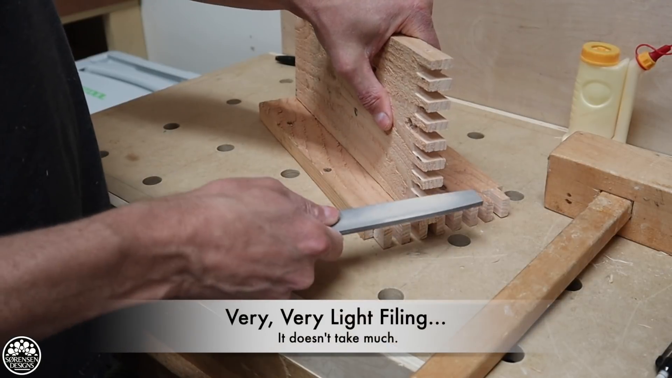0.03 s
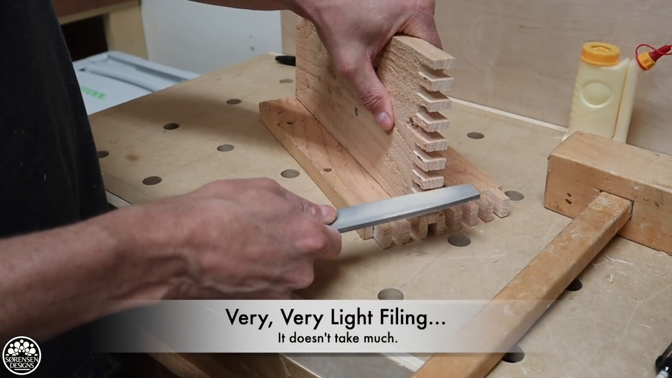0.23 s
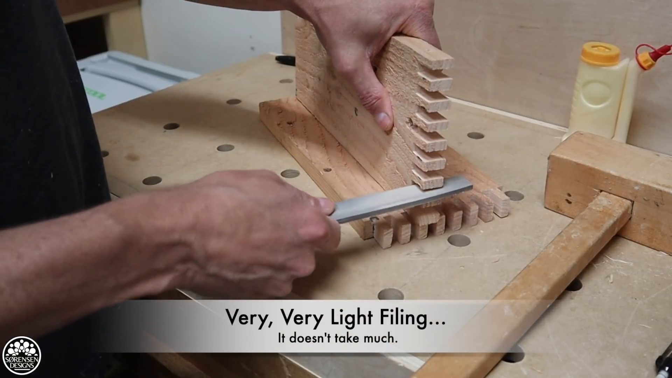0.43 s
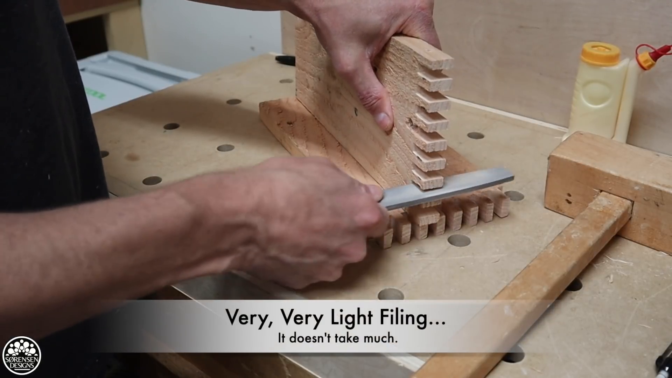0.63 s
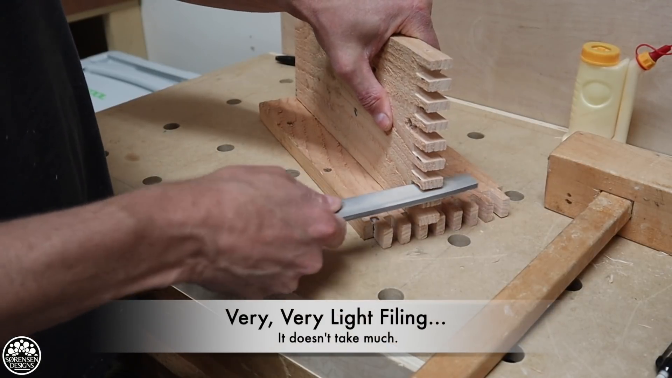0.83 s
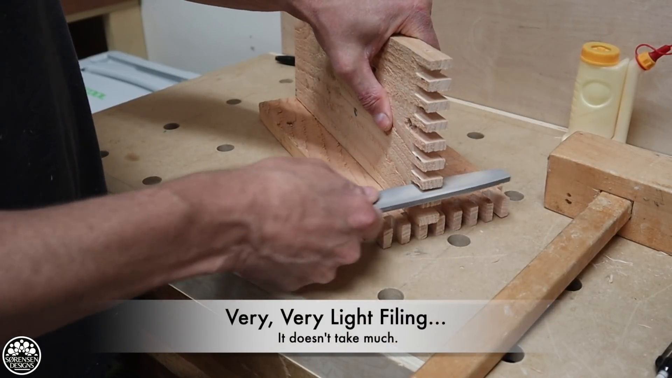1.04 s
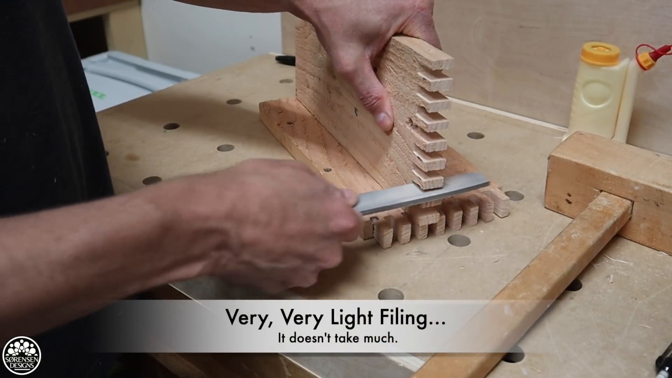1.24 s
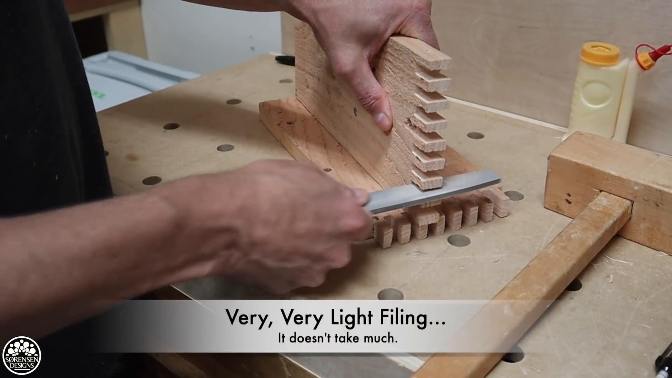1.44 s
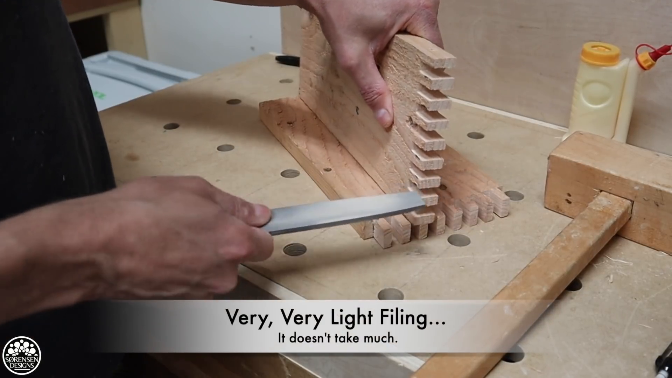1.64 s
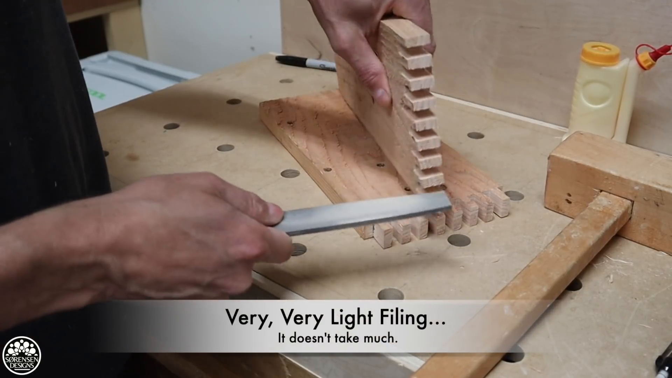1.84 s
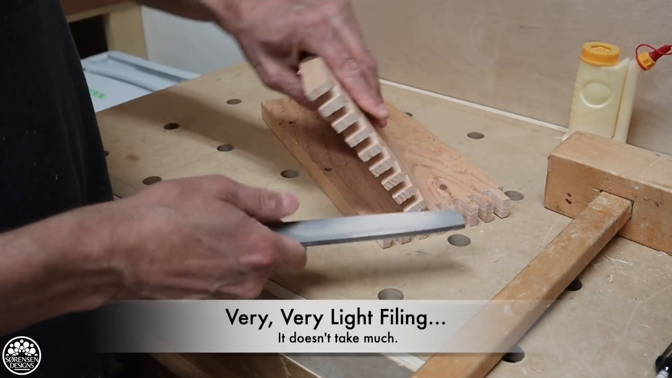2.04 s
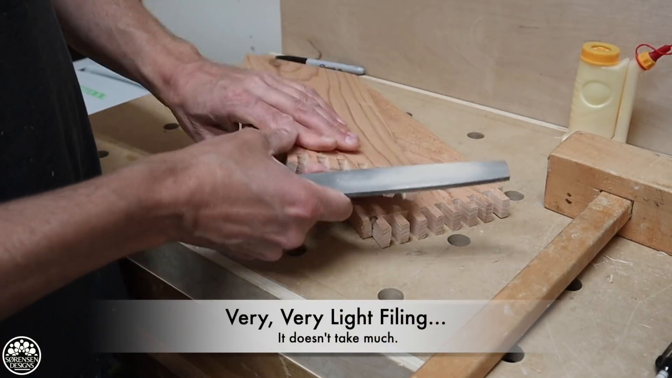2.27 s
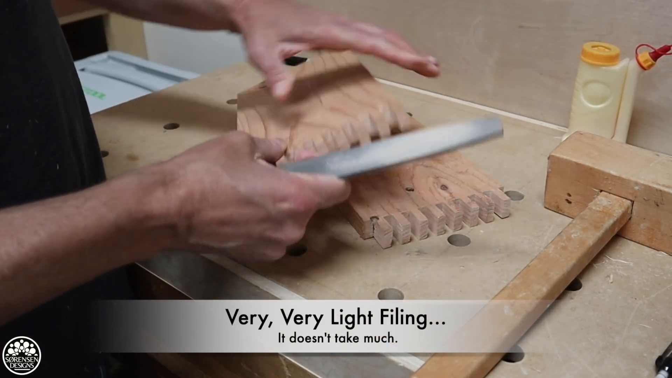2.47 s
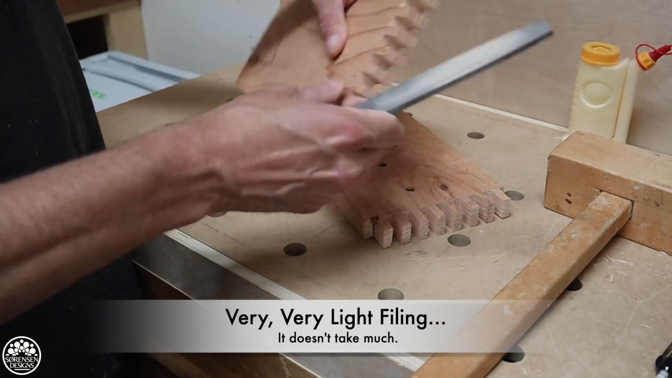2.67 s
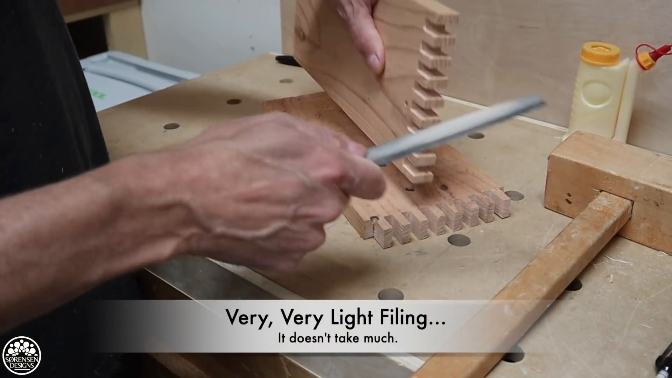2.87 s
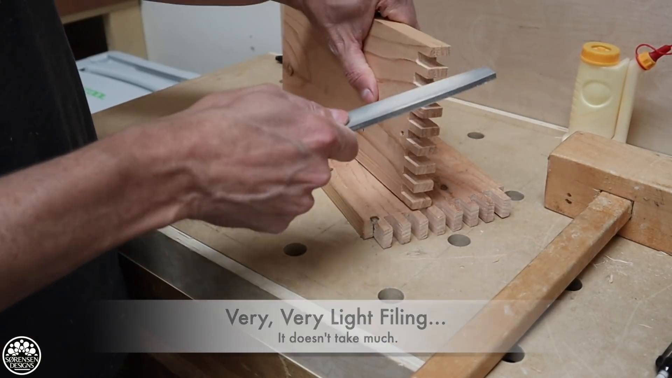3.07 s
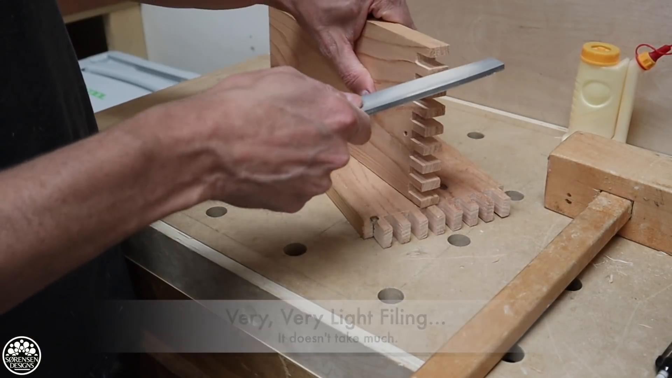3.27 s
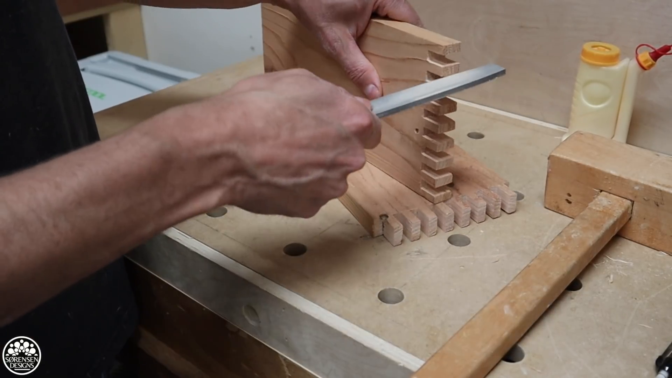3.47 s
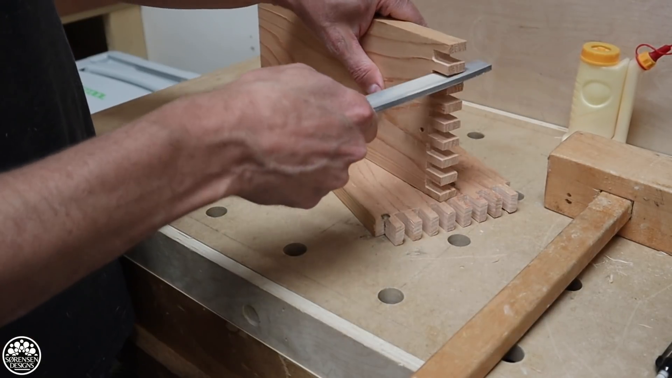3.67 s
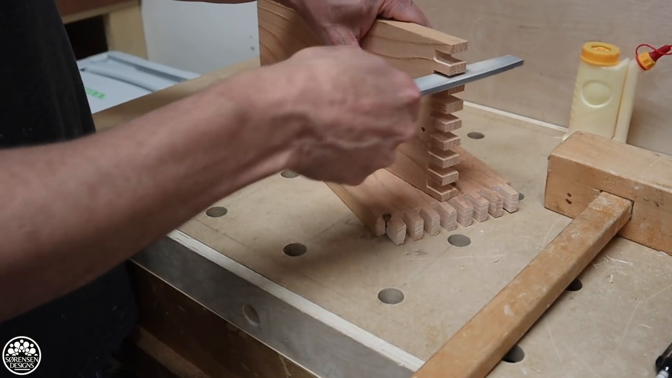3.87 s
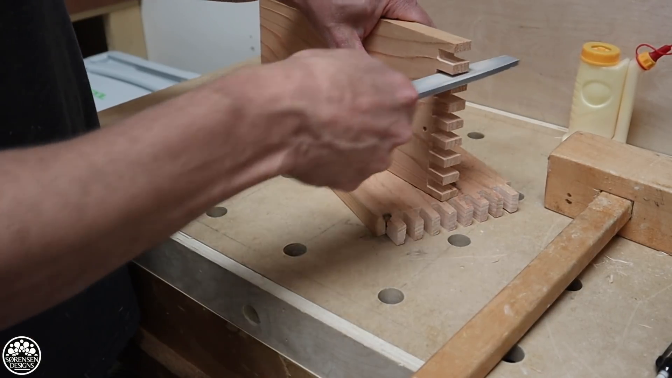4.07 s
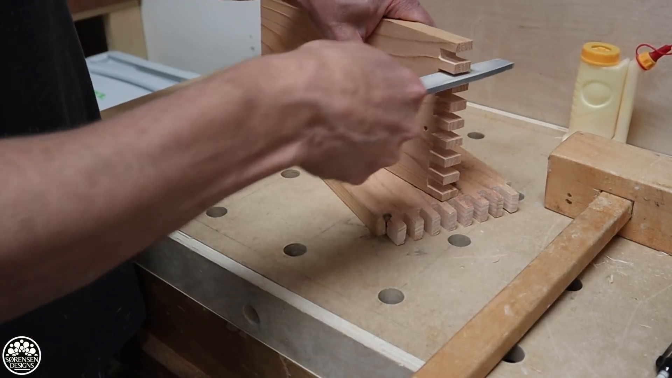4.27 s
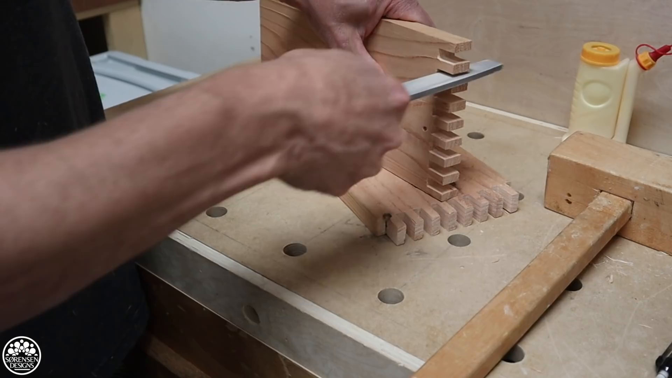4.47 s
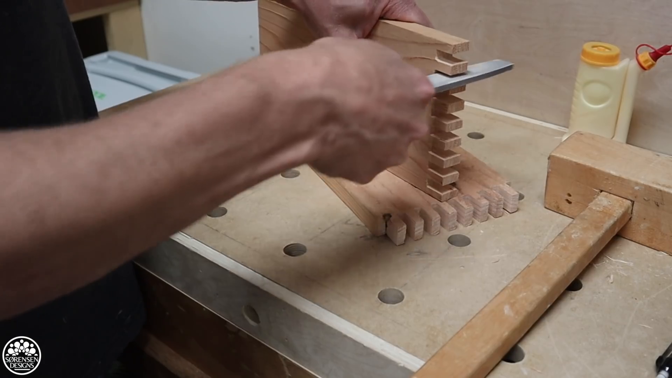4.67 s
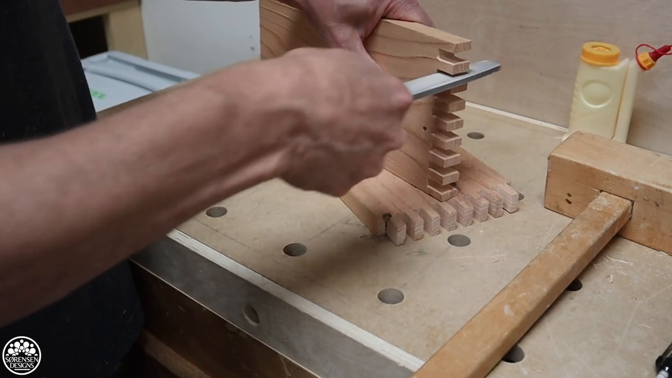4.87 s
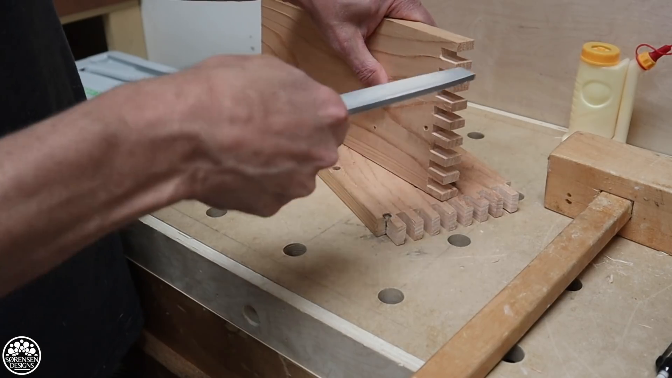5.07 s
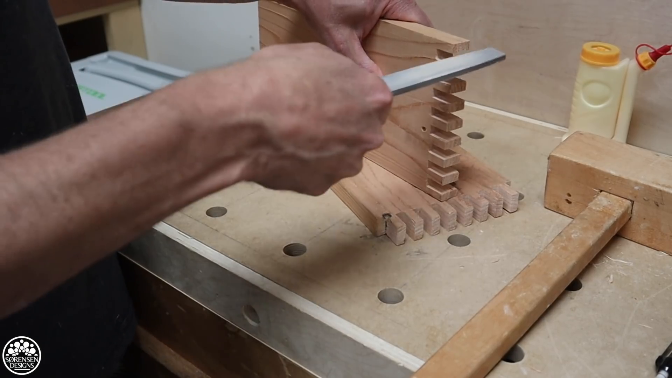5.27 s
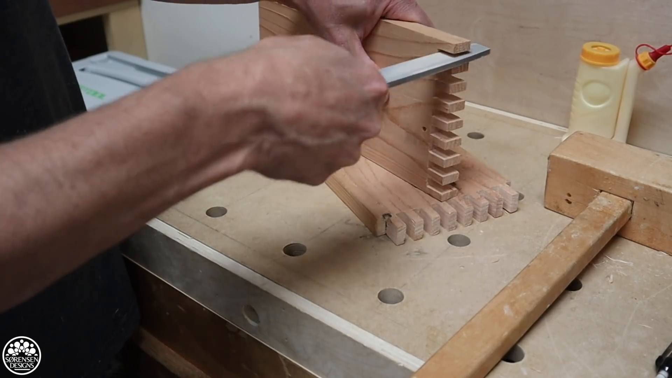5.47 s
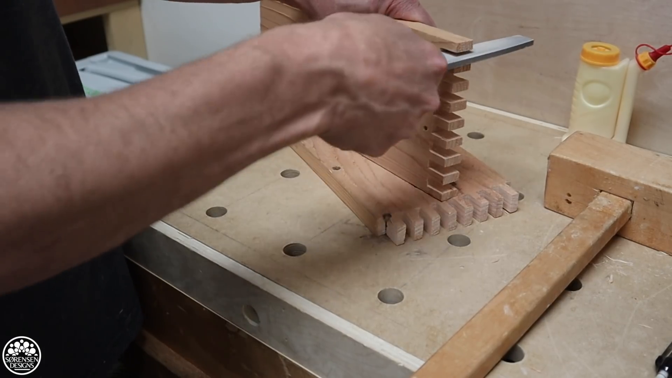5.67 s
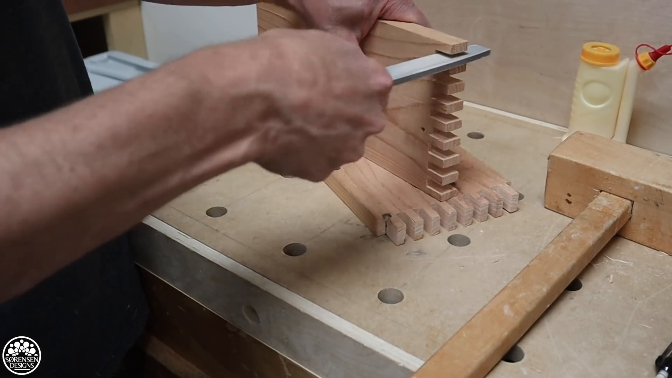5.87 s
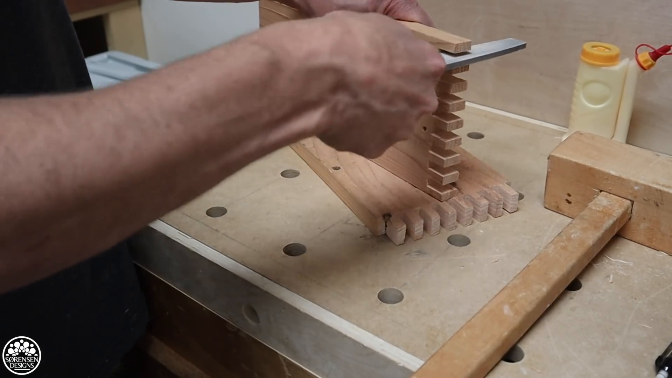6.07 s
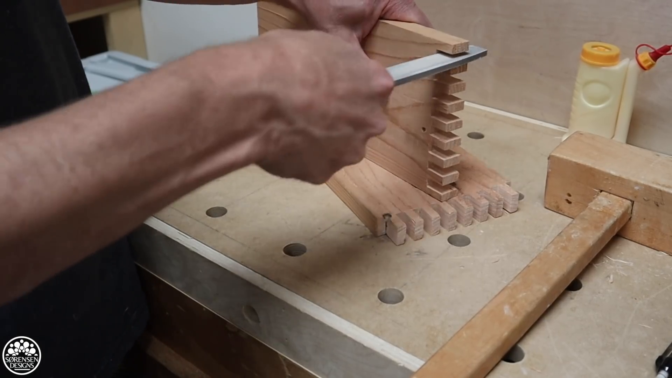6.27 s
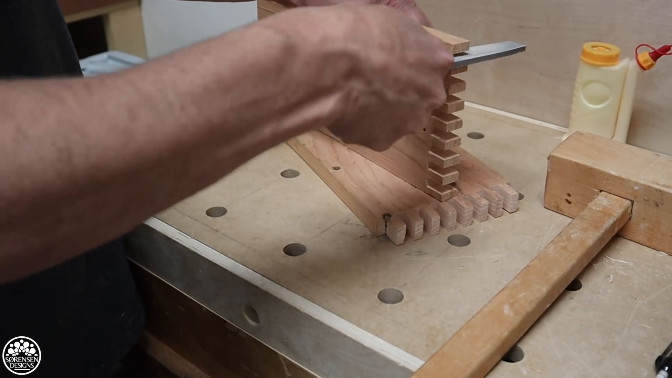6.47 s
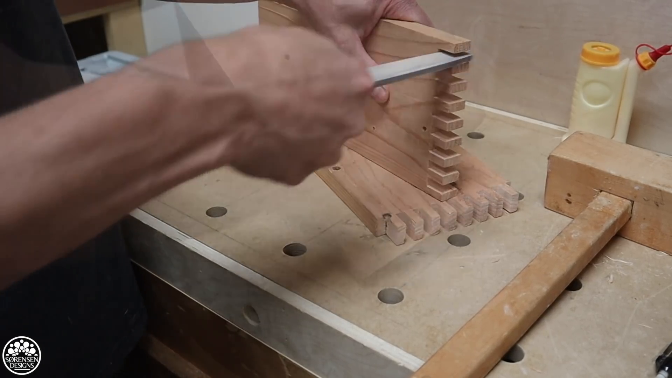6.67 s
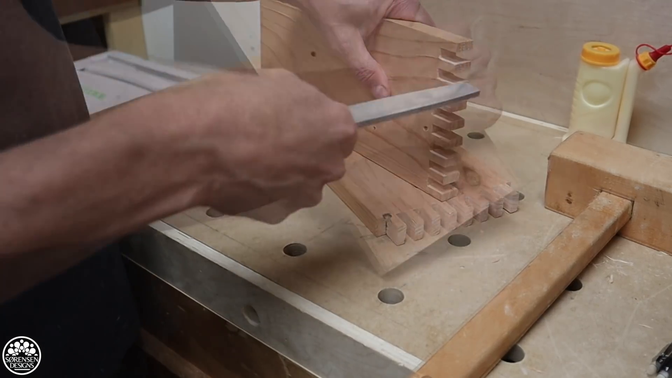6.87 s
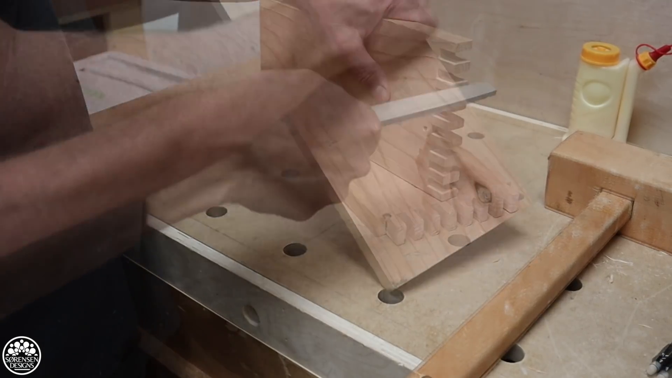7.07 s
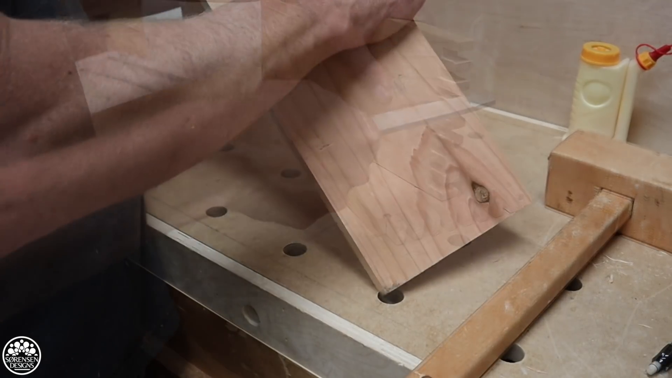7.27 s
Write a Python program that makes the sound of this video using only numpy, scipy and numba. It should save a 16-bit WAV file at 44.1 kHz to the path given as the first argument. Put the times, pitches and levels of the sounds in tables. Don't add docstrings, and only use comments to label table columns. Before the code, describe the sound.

Close in a small workshop, a hard wooden knock and a lighter one lead into six quick, dry file strokes on a board's finger joint. The board is slid, ticked by the blade and banged down on the bench several times. After a sharp clack of blade on wood come six more strokes, a brief clatter, then six more, ending in soft scuffs and light knocks.

```python
import sys
import numpy as np
from scipy import signal
from scipy.fft import rfft, irfft, next_fast_len
from scipy.io import wavfile
from scipy.ndimage import uniform_filter1d
from numba import njit

SR = 44100
rng = np.random.default_rng(int(sys.argv[2]) if len(sys.argv) > 2 else 0)


def boost_factor(decibels):
    exponent = np.asarray(decibels, float) / 20
    return 10 ** exponent


def int16_out(signal):
    q = np.round(np.clip(np.atleast_2d(signal).T, -1, 1) * 32767)
    wavfile.write(sys.argv[1], SR, q.astype(np.int16))


N = 322371
FIRM = 0.04

# f/Hz, width/Hz, level/dB
BENCH = [(108, 14, -1), (155, 10, -8), (178, 50, -2), (260, 45, 1), (316, 91, -3), (420, 80, -5)]
# f/Hz, width/Hz, level/dB
PANEL = [(726, 57, -14), (857, 38, 2), (900.6, 37.7, 4), (964, 54, -3), (1007, 160, -13)]
# f/Hz, width/Hz, level/dB
FLAT = [(335, 190, 0.5), (716, 40, 5), (996, 120, -1), (1454, 240, 5), (2230, 190, -7.5), (2630, 56, -13),
        (3400, 680, -13.5), (6700, 190, -24)]
# f/Hz, width/Hz, level/dB
EDGE = [(360, 140, -3.5), (662, 69, 2.5), (2370, 120, -16.5), (3340, 120, -20), (3610, 69, -27),
        (4540, 110, -22), (4690, 64, -24), (5560, 320, -21.5), (5900, 98, -35), (6470, 140, -29)]
# f/Hz, width/Hz, level/dB
CLACK = [(473, 32, -14), (855, 48, 5), (1244, 105, -4.5), (2520, 170, -13.5), (3320, 160, -18),
         (4400, 130, -22), (4870, 94, -25), (5300, 96, -26), (6360, 150, -35), (7730, 250, -34)]


def unit(x):
    return x / np.sqrt(np.mean(x ** 2))


def decibels(gain):
    return 20 * np.log10(gain + 1e-6)


def add(out, start, sound):
    out[start:start + len(sound)] += sound[:N - start]


def highpass(x, order, hz):
    return signal.sosfilt(signal.butter(order, hz, "high", fs=SR, output="sos"), x)


def bandpass(x, order, low_hz, high_hz):
    return signal.sosfilt(signal.butter(order, [low_hz, high_hz], "band", fs=SR, output="sos"), x)


def colour(x, points):
    hz, db = np.transpose(points)
    f = np.maximum(np.arange(len(x) // 2 + 1) * SR / len(x), 1)
    return irfft(rfft(x) * boost_factor(np.interp(np.log(f), np.log(hz), db)), len(x))


def walk(rate_hz):
    k = int(SR / rate_hz)
    held = np.repeat(rng.standard_normal(N // k + 1), k)
    return unit(uniform_filter1d(held, k)[:N])


def speed(start_s, length_s, top):
    share = (np.arange(N) / SR - start_s) / length_s
    stage = np.interp(share, [0, np.clip(top, .05, .95), 1], [0, .5, 1])
    return np.sin(np.pi * stage).clip(0), share.clip(0, 1)


def grains(scatter_db, patchy_db):
    patches = np.clip(0.52 * walk(40) + walk(150), -3, 2)
    size = boost_factor(scatter_db * np.minimum(rng.exponential(size=N), 5) + patchy_db * patches)
    return unit(size * rng.standard_normal(N))


def teeth(hz, jitter, scatter_db):
    phase = np.cumsum(hz * np.clip(1 + jitter * walk(400)[:len(hz)], .1, 3) / SR)
    catch = np.diff(np.floor(phase), prepend=0) * boost_factor(scatter_db * rng.standard_normal(len(hz)))
    return unit(catch - catch.mean())


def fibres(x, brighten=0.1):
    pressure = np.sqrt(np.maximum(uniform_filter1d(x ** 2, size=400), 0))
    return x * np.sign(rng.random(len(x)) - .5) * (pressure / FIRM) ** brighten


@njit
def resonate(x, hz, width, gain):
    y, z, pole = np.empty(len(x)), 0j, 0j
    for i in range(len(x)):
        if i % 64 == 0:
            pole = np.exp((2j * np.pi * hz[i // 64] - np.pi * width) / SR)
        z = z * pole + x[i]
        y[i] = gain[i // 64] * z.imag
    return y


def ring(x, modes, drift=0.0055, sway_db=2.5):
    steel_hz, steel_sway_db = 7300, 3.2
    chance = rng.standard_normal((2, len(modes), len(x) // 64 + 1))
    wander = uniform_filter1d(chance, size=60, axis=2) * np.sqrt(60)
    landing = uniform_filter1d(wander[1], size=100, axis=1) * 1.4
    apart, out = fibres(x), 0
    for k, (hz, width_hz, db) in enumerate(modes):
        width_hz = max(width_hz, (hz / 700) ** 2)
        sway = steel_sway_db * landing[k] if hz > steel_hz else sway_db * wander[1, k]
        gain = (-1) ** k * boost_factor(db + sway) * 2 * np.pi * width_hz / SR
        force = np.roll(apart, 40 * k) if hz > 5600 else x
        out = out + resonate(force, hz * (1 + drift * wander[0, k]), 1. * width_hz, gain)
    return out


def body(modes, broad_db=None, **wander):
    # f/Hz, level/dB
    grain_colour = [(1200, -38), (2200, -5), (3500, -8.5), (5000, -14.5), (7000, -16.5), (9000, -17),
                    (12000, -20), (16000, -30)]

    def shake(x):
        if broad_db is None:
            return ring(x, modes, **wander)
        padded = np.pad(fibres(x), (0, next_fast_len(len(x)) - len(x)))
        hiss = colour(padded, grain_colour)[:len(x)]
        return ring(x, modes, **wander) + boost_factor(broad_db) * hiss

    scale = np.std(shake(FIRM * rng.standard_normal(SR // 2))) / FIRM
    return lambda x: shake(x) / scale


def driven(force, db, shaken):
    tail = np.full(SR // 8, -200.)
    return shaken(force[:len(db) + len(tail)] * boost_factor(np.append(db, tail))[:len(force)])


def strike(modes, push_s):
    t = np.arange(SR // 4) / SR
    tail = 0
    for k, (hz, width_hz, db) in enumerate(modes):
        decay = np.exp(-np.pi * abs(width_hz) * t)
        tail = tail + (-1) ** k * boost_factor(db) * decay * np.sin(2 * np.pi * hz * t)
    return tail * (1 - np.exp(-t / max(push_s, 1e-5)))


def raised(modes, db):
    return [(hz, width_hz, d + db) for hz, width_hz, d in modes]


def low_finger():
    # f/Hz, width/Hz, level/dB
    finger = [(1220, 240, -7), (1305, 26, 4), (1480, 100, -10), (1680, 86, 1), (2125, 45, -2),
              (2242, 113, 4.5), (2380, 115, 3), (2510, 48, -4.5), (2864, 65, 1), (3410, 71, -12),
              (3800, 360, -10), (4270, 130, -7.5), (4780, 82, -10.5), (5350, 43, -9)]
    # f/Hz, width/Hz, level/dB
    steel = [(6250, 45, 8), (6400, 80, -1), (6660, 80, 9.5), (6700, 140, -12.5), (8100, 120, -10),
             (8460, 230, -0.5), (8550, 150, -4), (9100, 200, -11), (10700, 230, -7), (11100, 260, -16.5),
             (12500, 320, -12), (13200, 360, -15), (13900, 400, -19.5)]
    return finger + raised(steel, -21)


def air():
    # f/Hz, level/dB
    hiss_colour = [(25, -30), (53, -40), (90, 3), (172, -14.5), (266, -19), (753, -25.5), (935, -13),
                   (1240, -25), (4260, -24.5), (4860, -27.5), (5780, -30), (16000, -34)]
    hiss_db, hum_hz, hum_db = -63.5, 59, -65
    fade_from_s, fade_db_s = 5.1, 9
    t = np.arange(N) / SR
    hiss = unit(colour(rng.standard_normal(N), hiss_colour)) * boost_factor(hiss_db + 1.0 * walk(1.0))
    level_db = hum_db - fade_db_s * (t - fade_from_s).clip(0) + 1.5 * walk(4.2)
    return hiss + boost_factor(level_db) * np.sin(2 * np.pi * hum_hz * t)


def sliding():
    # t/s, length/s, scuff/dB, rumble/dB, clatter/dB
    slides = [(0.162, 0.15, -52.5, -51.5, -56), (0.521, 0.02, -36, -47, -57),
              (1.703, 0.11, -46, -47, -41.5), (1.731, 0.17, -38.5, -44.5, -43),
              (2.015, 0.11, -37, -41, -41.5), (2.168, 0.13, -46, -59, -53), (2.294, 0.18, -39, -48, -45),
              (2.59, 0.18, -40, -62, -58), (2.736, 0.072, -35.5, -58, -43), (2.823, 0.051, -71, -65, -70),
              (3.235, 0.17, -44.5, -55, -45), (3.413, 0.077, -43, -46, -41.5),
              (3.476, 0.11, -42, -40, -39.5), (3.588, 0.03, -52, -36, -36), (3.628, 0.12, -48, -50, -46),
              (3.845, 0.047, -40, -44, -31), (5.077, 0.14, -56, -60, -55),
              (5.479, 0.081, -45.5, -37, -34.5), (5.576, 0.023, -30.5, -30, -17.5),
              (6.784, 0.36, -57, -55, -54), (7.034, 0.27, -43.5, -43.5, -53), (7.11, 0.054, -62, -48, -72),
              (7.278, 0.09, -47, -42, -46)]
    # t/s, scuff/dB, rumble/dB, clatter/dB, fall/(dB/s)
    settling = [(0, -62, -81, -61, 80), (0.133, -48, -32, -34.5, 180), (0.365, -47.5, -35, -46, 120),
                (0.442, -40.5, -37.5, -39.5, 175), (1.953, -40.5, -42, -51.5, 182),
                (2.105, -42.5, -33.5, -40, 173), (2.458, -62, -22, -15.5, 503),
                (2.51, -54, -31, -22.5, 136), (2.712, -52, -30, -53, 250), (3.077, -49, -19, -27, 226),
                (3.531, -38, -40, -45, 123), (3.708, -52, -36, -47, 220), (5.343, -38.5, -33, -30, 272.5),
                (5.406, -62, -36, -57, 200), (5.553, -61, -36, -40, 200), (7.038, -43.5, -43.5, -32.5, 105)]
    slide_power, slide_top = 0.85, 0.57
    rock_s = 0.0011
    t, power = np.arange(N) / SR, 0
    for s, length_s, *dbs in slides:
        swell = speed(s, length_s, slide_top)[0] ** slide_power
        power = power + np.outer(boost_factor(np.array(dbs)), swell) ** 2
    for s, *dbs, fall_db_s in settling:
        rocking = np.clip((t - s) / rock_s, 0, 1) * boost_factor(-fall_db_s * abs(t - s))
        power = power + np.outer(boost_factor(np.array(dbs)), rocking) ** 2
    return np.sqrt(power)


def handling():
    # f/Hz, width/Hz, level/dB
    loose = [(1340, 24, -1.5), (2200, 83, -6.5), (2304, 48, 3), (2620, 140, -23), (3490, 57, 0),
             (4340, 170, -4.5), (4870, 120, -7.5), (5300, 170, -4.5), (6600, 560, -12.5), (7350, 92, -27),
             (8700, 150, -39), (11140, 220, -38)]
    # f/Hz, width/Hz, level/dB
    turned_over = [(1370, 23, -2), (2200, 160, -2), (2464, 230, -5), (3490, 260, -1.5), (4460, 160, -6.5),
                   (4950, 73, -1), (5470, 77, -4.5), (6370, 340, -10), (7630, 150, -18)]
    # f/Hz, width/Hz, level/dB
    clattering = [(438, 70, 5), (664, 42, -0.5), (860, 35, 5.5), (1016, 69, 2.5), (1330, 52, -1),
                  (1380, 300, -7), (1720, 950, -16.5)]
    # t/s, f/Hz, width/Hz, level/dB
    brushes = [(2.775, 5300, 60, -50), (2.765, 5000, 9, -58), (2.05, 3580, 20, -54), (2.795, 4960, 14, -58),
               (2.98, 4950, 12, -66), (2.94, 3500, 30, -64), (3.28, 11000, 30, -66), (3.63, 7700, 40, -58),
               (3.66, 7700, 40, -56), (3.695, 7600, 60, -55), (3.73, 7650, 40, -60), (2.10, 860, 14, -43),
               (1.75, 1320, 10, -50)]
    # t/s, peak/dB, ring f/Hz
    ticks = [(0.19, -47, 2260), (0.213, -50, 2380), (1.751, -38, 2330), (1.78, -37, 2340),
             (1.829, -34, 2220), (1.867, -30.5, 2310), (1.928, -44, 2360), (1.958, -38, 2360),
             (2.033, -49, 2380), (2.06, -48, 2210), (2.32, -41, 2360), (2.637, -38, 2640),
             (2.677, -36.5, 2280), (2.758, -48, 2160), (2.79, -54, 2260), (3.325, -54, 2260),
             (3.427, -41, 2200), (3.445, -51, 2250), (3.507, -53, 3330), (3.61, -47, 3340),
             (3.695, -52, 2220), (5.342, -33.5, 2250), (5.357, -43, 2195), (5.568, -31, 2250)]
    # share of ring f, width/Hz, level/dB
    tick_modes = [(0.57, 60, -18), (1, 55, 0), (1.53, 150, -3), (2.2, 250, -2), (2.85, 400, -16)]
    loose_s, turned_s = 0.6, 2.9
    t = np.arange(N) / SR
    scuff, rattle = grains(scatter_db=1.0, patchy_db=2.0), grains(scatter_db=2.0, patchy_db=2.5)
    skin = body(loose, broad_db=0.5, drift=0.021, sway_db=-5.0)
    bench, boards = body(BENCH), body(clattering, drift=0.063, sway_db=2.0)
    turned = body(turned_over, broad_db=-0.5, drift=0.015, sway_db=2.5)
    laid = body(low_finger(), broad_db=2.5, drift=0.0045, sway_db=-4.0)
    rub, rumble, clatter = sliding()
    out = skin(boost_factor(-5.5) * rub * scuff * (t >= loose_s) * (t < turned_s))
    out = out + turned(boost_factor(-6.0) * rub * scuff * (t >= turned_s))
    out = out + laid(boost_factor(-4.5) * rub * scuff * (t < loose_s))
    out = out + bench(boost_factor(-3.0) * rumble * rattle) + boards(boost_factor(-5.5) * clatter * rattle)
    for s, hz, width_hz, db in brushes:
        cluster = [(hz * r, width_hz, db + 1) for r in (.991, 1, 1.006, 1.017)]
        add(out, int(s * SR), strike(cluster, push_s=.008))
    for s, db, hz in ticks:
        add(out, int(s * SR), strike([(hz * r, w, db + d) for r, w, d in tick_modes], push_s=0.00085))
    return out


def knocks():
    # t/s, peak/dB, main ring f/Hz, crack/dB, ring t60/s
    blows = [(0.1328, -9.5, 537, -42.5, 0.011), (0.3633, -22, 249, -44, 0.052),
             (0.448, -54, 253, -47, 0.11), (0.527, -38, 474, -53, 0.055), (1.868, -66, 268, -49, 0.06),
             (1.959, -49, 281, -53, 0.22), (2.099, -33, 255.7, -45, 0.26), (2.43, -46, 316, -46, 0.057),
             (2.459, -30, 1490, -46, 0.019), (2.4537, -18, 338, -64, 0.063), (2.507, -24, 280, -63, 0.17),
             (2.675, -35.5, 980, -49, 0.12), (2.707, -11, 318, -35, 0.078), (2.738, -26, 290, -65, 0.069),
             (2.063, -36, 290, -60, 0.082), (3.755, -26, 844, -64, 0.06), (3.076, -15, 312, -30.5, 0.06),
             (3.423, -50, 1040, -53, 0.077), (3.531, -33, 874, -46, 0.064), (3.71, -29, 1325, -45.5, 0.088),
             (5.343, -29, 883, -56, 0.11), (5.405, -21, 293.2, -65, 0.037), (5.478, -30.5, 213, -50, 0.11),
             (5.553, -26.5, 400, -52, 0.06), (6.897, -32, 330, -67, 0.03),
             (7.035, -33.5, 462, -52.5, 0.074), (7.174, -28, 290, -53, 0.035)]
    # share of main ring f, level/dB
    wood_modes = [(0.451, -23), (0.621, -13.5), (0.802, -8), (1.001, 0), (1.17, -9), (1.42, -9.5),
                  (1.7, -13.5), (2.1, -20), (2.6, -15.5), (3.2, -16), (3.9, -18)]
    thud_db, thud_share = -38, 0.32
    out, t = np.zeros(N), np.arange(SR // 20) / SR
    bench_hz, bench_width_hz = BENCH[0][:2]
    for s, db, hz, crack_db, t60_s in blows:
        width_hz = np.log(1000) / np.pi / max(t60_s, .01)
        wood = [(hz * r, width_hz * r ** 0.55, db + d) for r, d in wood_modes]
        thud = (bench_hz, bench_width_hz, thud_db + thud_share * db)
        add(out, int(s * SR), strike(wood + [thud], push_s=.3 / hz))
        crack = bandpass(rng.standard_normal(len(t)), 3, 1300, np.clip(9 * hz, 5000, 14000))
        add(out, int(s * SR), boost_factor(crack_db + 11) * crack * np.exp(-t / .0018))
    return out


def filing():
    # t/s, length/s, grain/dB, share of length at top speed, panel ring/dB
    strokes = [(0.525, 0.21, -26.5, 0.53, 4.5), (0.753, 0.15, -27.5, 0.55, 3.5),
               (0.927, 0.16, -27, 0.4, 5.5), (1.107, 0.16, -29.5, 0.57, 1.5),
               (1.285, 0.17, -27.5, 0.44, 1.5), (1.462, 0.22, -31, 0.7, -1.5),
               (3.855, 0.19, -33, 0.79, 2.5), (4.103, 0.17, -29, 0.61, -3.5), (4.302, 0.15, -29.5, 0.62, 4),
               (4.486, 0.17, -29.5, 0.45, 2), (4.682, 0.15, -29, 0.59, 5.5), (4.89, 0.21, -31, 0.33, 2),
               (5.54, 0.238, -33, 0.65, 5), (5.818, 0.16, -29.0, 0.39, 0), (6.001, 0.16, -29.5, 0.5, 3.5),
               (6.2, 0.15, -30, 0.48, 3), (6.408, 0.14, -29.5, 0.43, 4.5), (6.615, 0.21, -33.5, 0.21, -3.5)]
    # teeth at top speed/Hz, catch/dB, roundness of swell, dust/dB
    bites = [(450, -7.5, 1.1, -1.7), (400, -11.5, 0.81, -1.7), (461, -8, 0.82, -2.7),
             (451.3, -7.5, 0.93, -3), (480, -12, 1, -2.5), (453, -9, 0.79, 0.5), (470, -4, 0.83, 0.5),
             (405.2, -7.5, 0.75, 0.5), (290, -7.5, 0.48, 0.1), (460.6, -14.5, 1.01, 1.7),
             (485.6, -16, .75, 1.8), (488, -4, 0.92, 1.5), (350, -2, 1, -0.5), (510, -5, 1.06, -0.5),
             (377.6, -8, 0.87, 0), (502, -9.5, 0.79, -1), (570, -19, 0.71, 1.3), (441, -7, 0.79, 1.6)]
    press = [1.1, -0.5, -0.2, 0.3, -3, 0.5, 0, 0.5, 1, -0.7, -2.4, -0.6, -0.5, -1.3, -1.5, -1, -2, -1.4]
    # thrum/dB, thrum growth/(dB/s), extra thrum on return/dB, panel ring/dB
    runs = [
        (2.5, -7.5, -3, -4),
        (-1.35, 1.5, -1.5, -1.7),
        (2, -7, 0.5, 0.5),
    ]
    landings = [
        0.525,
        3.864,
        5.568,
    ]
    # f/Hz, width/Hz, level/dB
    top_finger = [(1200, 247, 2), (1472, 140, 5), (1543, 160, 2), (2157, 94, 3.5), (2250, 92, 3.5),
                  (2394, 43, -1.5), (2556, 76, 2.5), (2990, 290, -8), (3510, 62, 0), (3830, 200, -7.5),
                  (4256, 203, -3), (5390, 235, -6), (6130, 760, -17)]
    # f/Hz, width/Hz, level/dB
    steel_high = [(6890, 220, -1), (7820, 190, -6.5), (8300, 150, -13), (9190, 160, -6.5),
                  (11300, 250, -18), (11470, 280, -16), (12800, 330, -17), (13400, 450, -22),
                  (14100, 400, -19.5), (14400, 460, -28)]
    # f/Hz, width/Hz, level/dB
    thrum_modes = [(180.6, 13, -1.5), (203.6, 13, -3.5), (257.4, 19, 1.5), (286, 27, -0.5),
                   (376, 30.7, -2.5), (401.6, 26, -1.5), (438.8, 38.7, 2.5), (474, 32.4, 0),
                   (583, 57, -2.5), (620, 55, -8), (683, 42, -4)]
    # f/Hz, width/Hz, level/dB
    panel_low_modes = [(724, 47, -14), (855, 32, -3), (907, 47, 0), (942, 36, 0), (977, 88, -12.5)]
    grain_power, thrum_power, panel_power, tooth_power = 1.09, 0.67, 0.83, 0.6
    rest_db, bench_db = -53.5, -28
    panel_lag_s, thrum_lead_db, panel_lead_db = 0.00085, 1, 1
    dust_hz, board_low_hz = 5500, 184

    thrum = body(thrum_modes, drift=0.025, sway_db=1.9)
    panel = body(PANEL, drift=0.0092, sway_db=0.24)
    panel_low = body(panel_low_modes, drift=0.0096, sway_db=1.9)
    low = body(low_finger(), broad_db=-6.5, drift=0.01, sway_db=1.9)
    top = body(top_finger + raised(steel_high, -11.5), broad_db=-6.5, drift=0.01, sway_db=1.9)
    bench = body(BENCH[:1])
    torn, rough = grains(scatter_db=3.0, patchy_db=0.5), grains(scatter_db=2.1, patchy_db=3.5)
    out, hum, dust_db = np.zeros(N), np.zeros(N), np.zeros(N)
    rows = np.reshape(np.column_stack([strokes, bites, press]), (len(runs), -1, 10))
    for run, lands_s, (thrum_db, growth_db_s, back_db, panel_db) in zip(rows, landings, runs):
        at, end = int(lands_s * SR), int(run[-1, :2].sum() * SR)
        tooth_hz, catch = 120., 0
        cut = shake = sing = boost_factor(rest_db)
        for k, row in enumerate(run):
            s, length_s, db, fastest, board_db, top_hz, catch_db, roundness, fine_db, press_db = row
            v, share = speed(s, length_s, fastest)
            tooth_hz = np.maximum(tooth_hz, top_hz * v ** tooth_power)
            catch = catch + boost_factor(catch_db) * (v > 0)
            dust_db[v > 0] = fine_db
            v = v ** roundness
            cut = np.hypot(cut, boost_factor(db + 3) * v ** grain_power)
            shake_db = db + press_db + back_db * (k % 2) + growth_db_s * (s - run[0, 0])
            shake_db = shake_db + thrum_lead_db * (1 - 2 * share)
            shake = np.hypot(shake, boost_factor(shake_db) * v ** thrum_power)
            v, share = speed(s + panel_lag_s, length_s, fastest)
            sing_db = db + board_db + panel_lead_db * (1.0 - 2 * share)
            sing = np.hypot(sing, boost_factor(sing_db) * v ** (panel_power * roundness))
        grain_db, shake_db, sing_db = (decibels(gain[at:end]) for gain in (cut, shake, sing))
        span = slice(at, end + SR // 8)
        catches = catch[span] * teeth(tooth_hz[span], jitter=.16, scatter_db=2.0)
        push = boost_factor(-2) * catches + boost_factor(-0.5) * rough[span]
        rasp = boost_factor(-7.5) * catches + boost_factor(1.0) * rough[span]
        finger, plate = (low, panel_low) if at < 2 * SR else (top, panel)
        add(out, at, driven(torn[at:], grain_db, finger))
        add(out, at, driven(push, shake_db + thrum_db, thrum))
        add(hum, at, driven(push, shake_db + bench_db, bench))
        add(out, at, driven(rasp, sing_db + panel_db, plate))
    out = out + jolts()
    dust = highpass(out, 2, dust_hz)
    out = out + (boost_factor(uniform_filter1d(dust_db, size=900)) - 1) * dust
    return hum + highpass(out, 3, board_low_hz)


def jolts():
    # t/s, peak/dB
    slips = [(0.639, -10.5), (0.971, -7), (4.014, 0), (4.18, -8), (4.228, -4), (4.31, -20), (4.332, -8),
             (4.39, -4), (4.425, 0), (4.716, -2), (4.757, -16), (4.929, -8), (5.719, 1.5), (5.834, -2.5),
             (5.869, -1), (6.017, -11), (6.036, -6), (6.127, -4), (6.433, -5), (6.507, 6), (6.532, 3.5),
             (6.628, -5.5), (4.503, -6), (5.584, -15)]
    out = np.zeros(N)
    for s, db in slips:
        add(out, int(s * SR), strike(raised(PANEL, db - 19.5), push_s=.0006))
    return out


def slams():
    # t/s, level/dB, push/s, modes
    blows = [
        (2.4591, -13.5, 0.00021, FLAT),
        (2.4626, -37, 0.00033, FLAT),
        (3.076, -23, 0.0002, EDGE),
        (3.0788, -13.5, 0.00025, EDGE),
        (3.7082, -8, 0.00027, CLACK),
        (3.7148, -26, 0.00024, CLACK),
    ]
    out = np.zeros(N)
    for s, db, push_s, modes in blows:
        struck = [(f, w, db + d + decibels(w / 100)) for f, w, d in modes]
        add(out, int(s * SR), strike(struck, push_s))
    return out


def room(x):
    # f/Hz, t60/s, level/dB
    bands = [(137, 0.0063, -16), (509, 0.46, -11), (1280, 0.46, -9), (3850, 0.45, -12.5),
             (10000, 0.028, -14.5)]
    t, echo = np.arange(SR // 2) / SR, 0
    for hz, t60_s, db in bands:
        band = bandpass(rng.standard_normal(len(t)), 2, hz / 2.0, hz * 2.07)
        fall = np.exp(-np.log(1000) * t / t60_s) * np.clip(t / 0.0048, 0, 1)
        echo = echo + boost_factor(db) * band * fall / np.sqrt(np.sum(fall ** 2))
    return signal.fftconvolve(x, echo)[:N]


def scene():
    near = handling() + knocks() + filing() + slams()
    heard = highpass(near + boost_factor(0.5) * room(near), 4, 83)
    return (heard + air())[None]


def band_limit(x):
    return signal.sosfilt(signal.butter(12, 15830, fs=SR, output="sos"), x)


def record(dry):
    ceiling, top_hz = 0.367, 15700
    lowpass = signal.ellip(8, .2, 70, top_hz, fs=SR, output="sos")
    mix = signal.sosfilt(lowpass, np.clip(dry, -ceiling, ceiling))
    return band_limit(mix)


dry = scene()
out = record(dry)
int16_out(out)
```